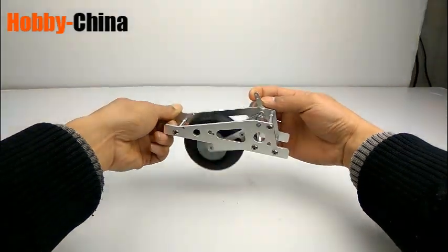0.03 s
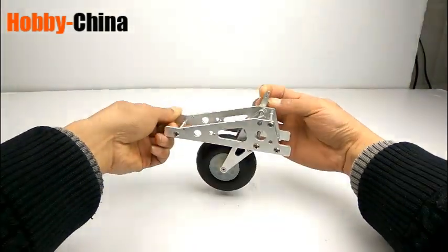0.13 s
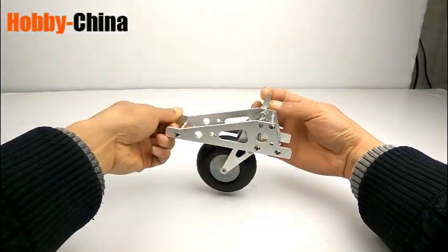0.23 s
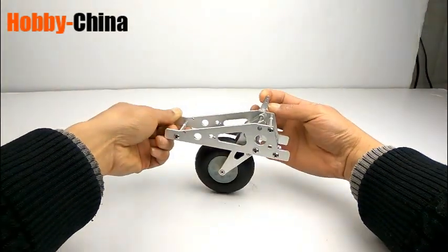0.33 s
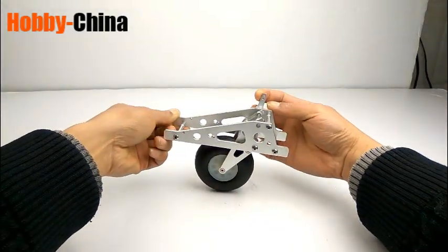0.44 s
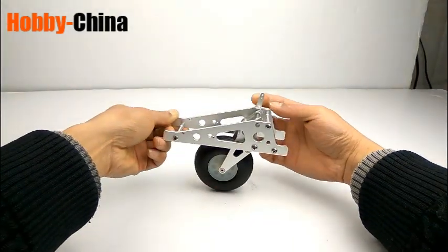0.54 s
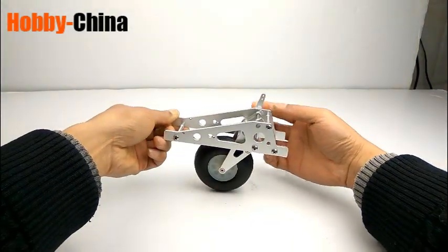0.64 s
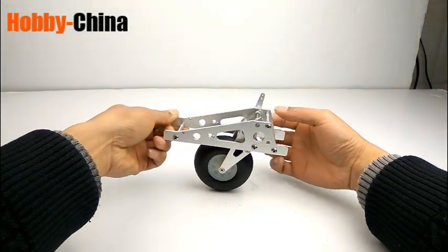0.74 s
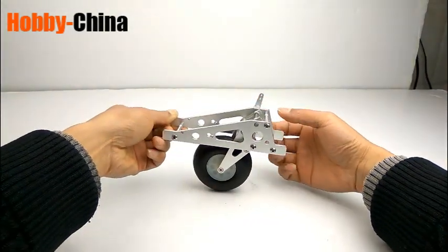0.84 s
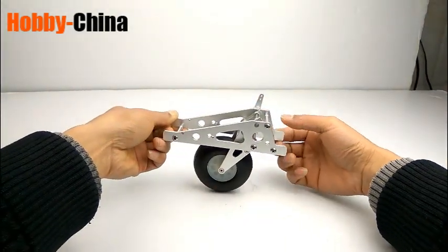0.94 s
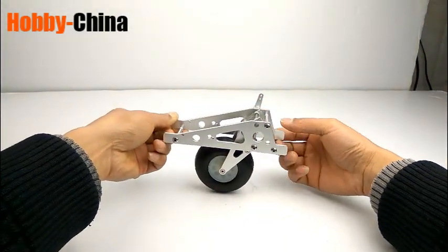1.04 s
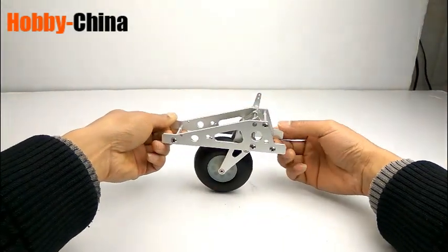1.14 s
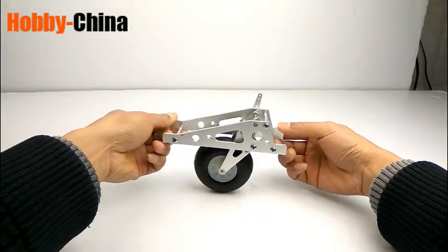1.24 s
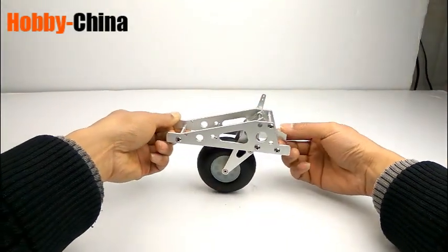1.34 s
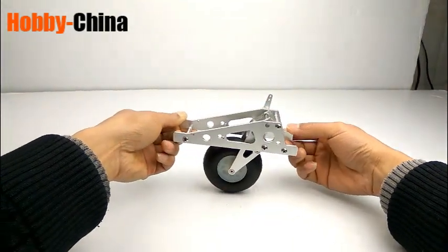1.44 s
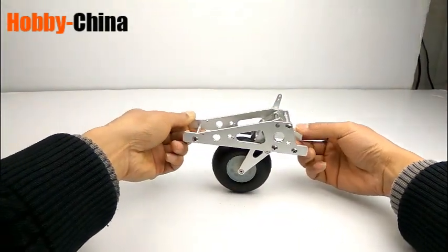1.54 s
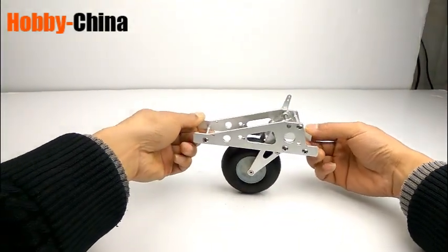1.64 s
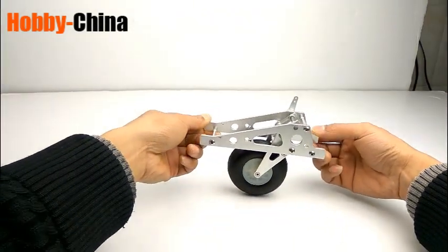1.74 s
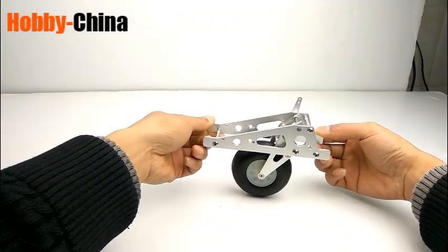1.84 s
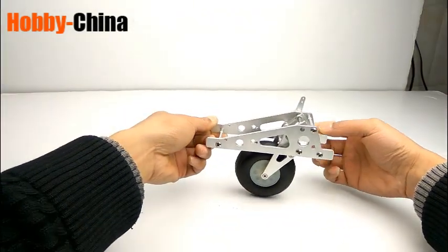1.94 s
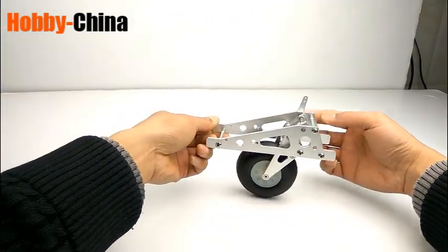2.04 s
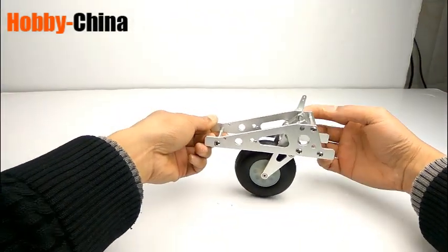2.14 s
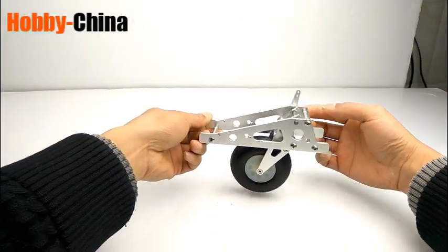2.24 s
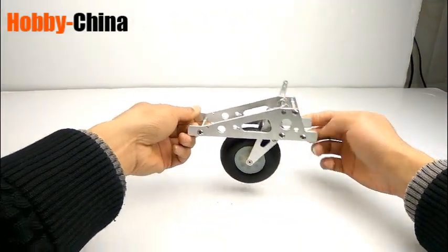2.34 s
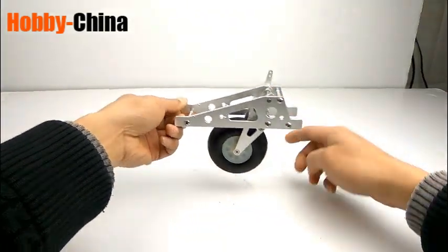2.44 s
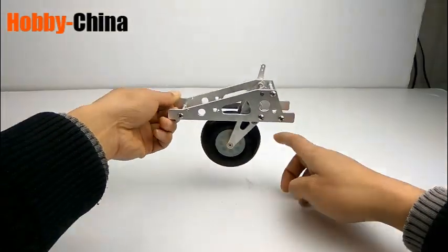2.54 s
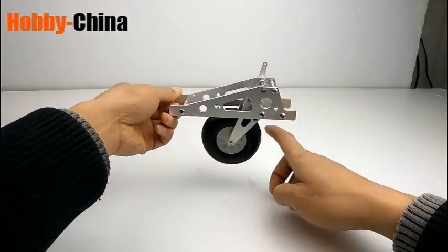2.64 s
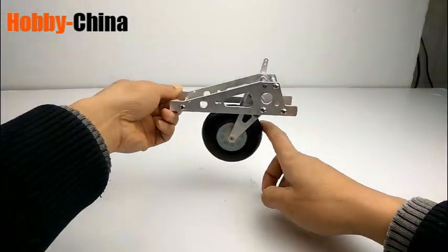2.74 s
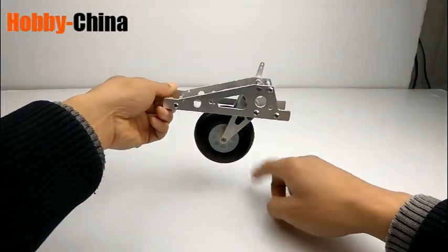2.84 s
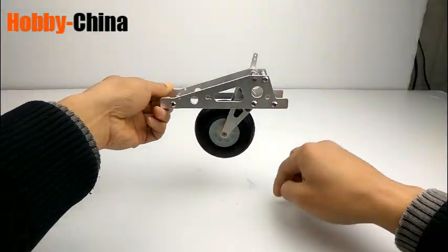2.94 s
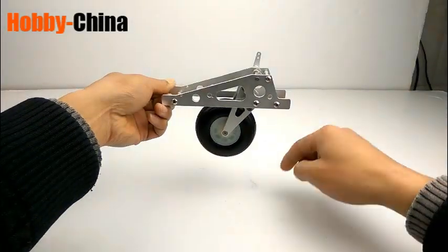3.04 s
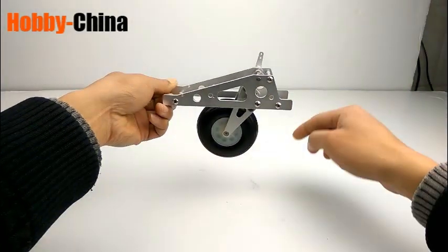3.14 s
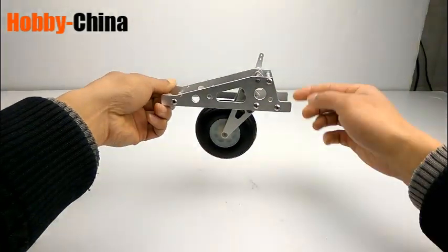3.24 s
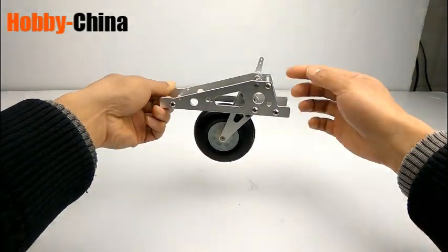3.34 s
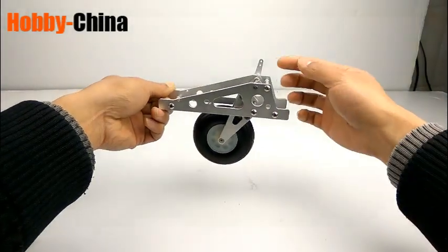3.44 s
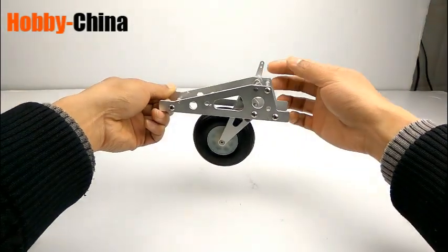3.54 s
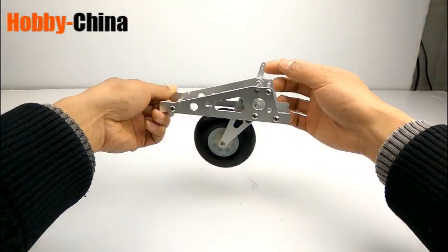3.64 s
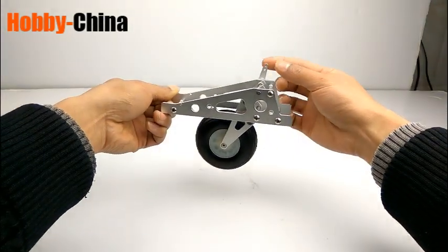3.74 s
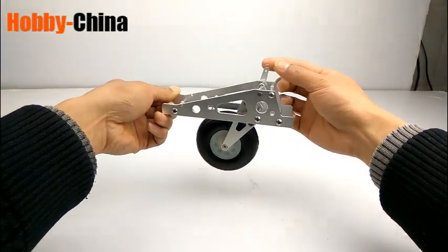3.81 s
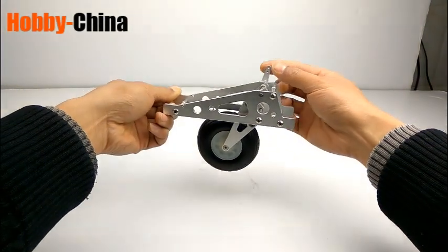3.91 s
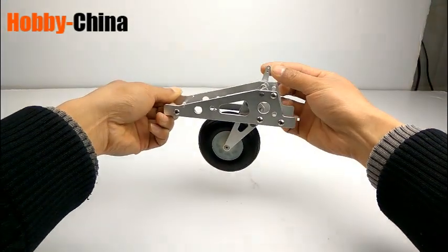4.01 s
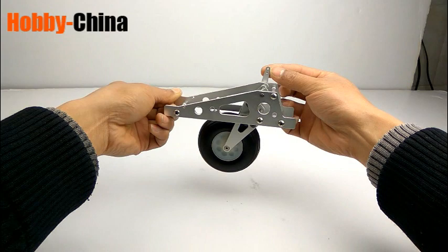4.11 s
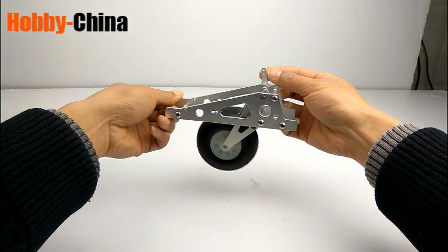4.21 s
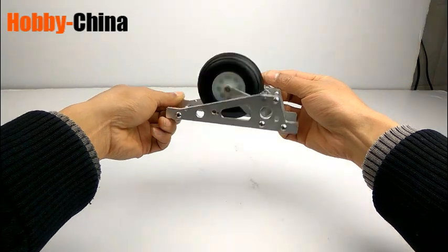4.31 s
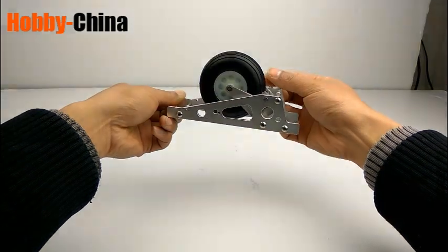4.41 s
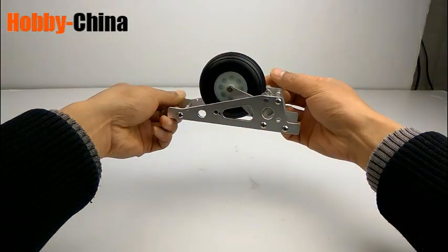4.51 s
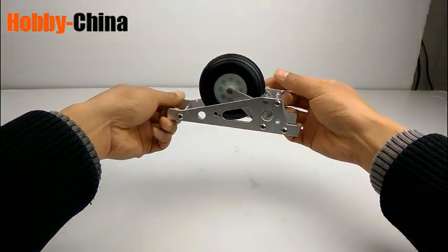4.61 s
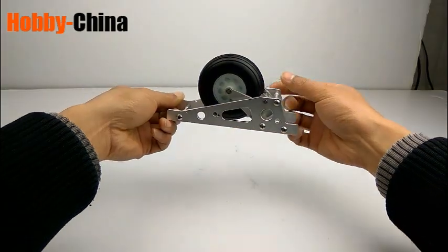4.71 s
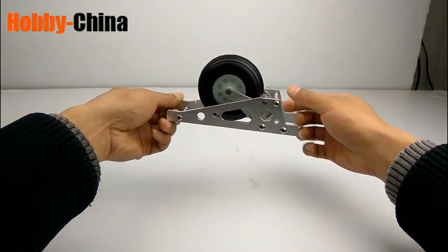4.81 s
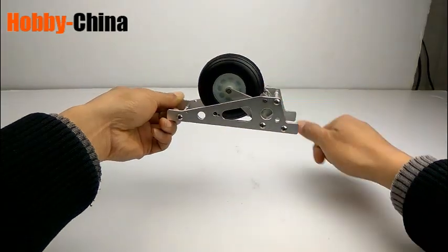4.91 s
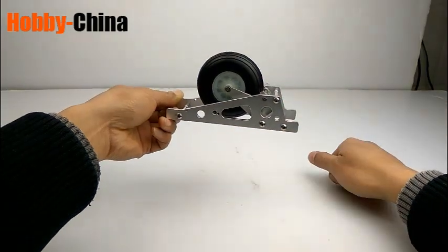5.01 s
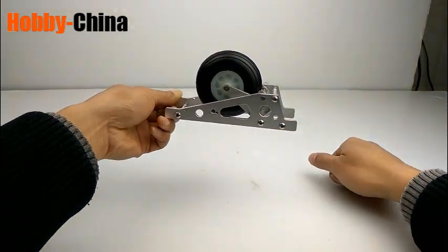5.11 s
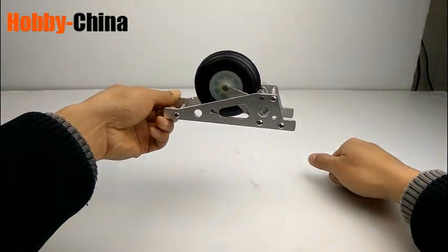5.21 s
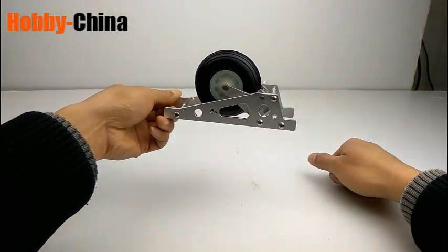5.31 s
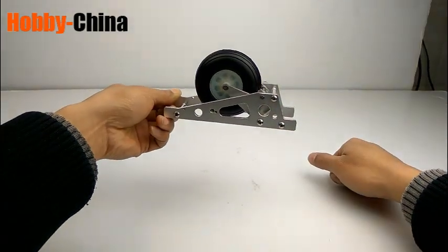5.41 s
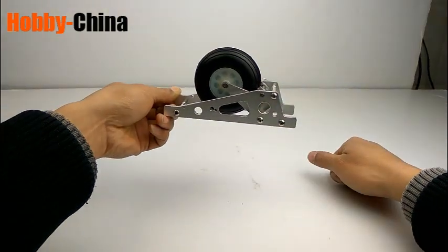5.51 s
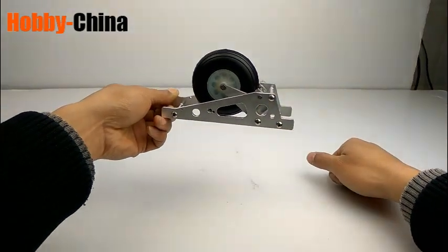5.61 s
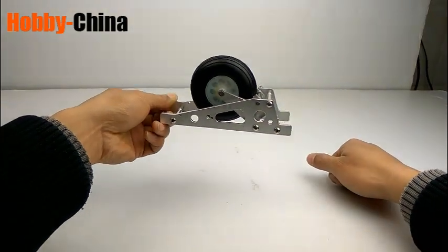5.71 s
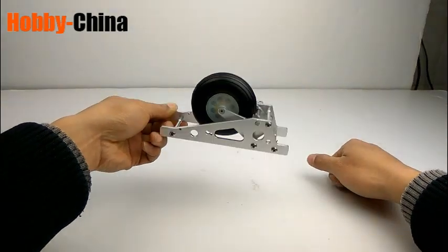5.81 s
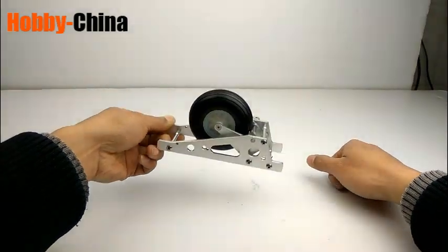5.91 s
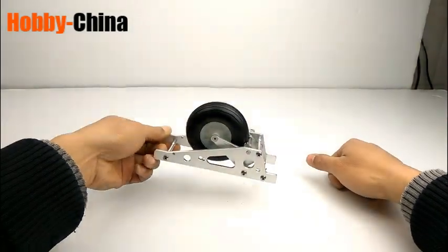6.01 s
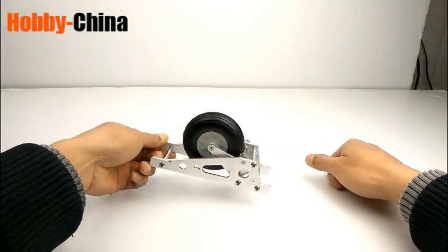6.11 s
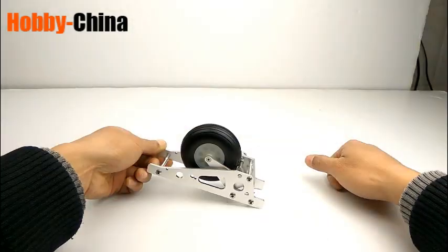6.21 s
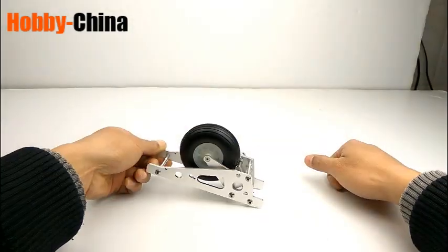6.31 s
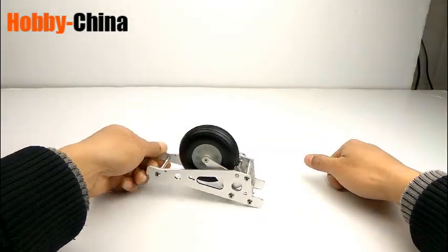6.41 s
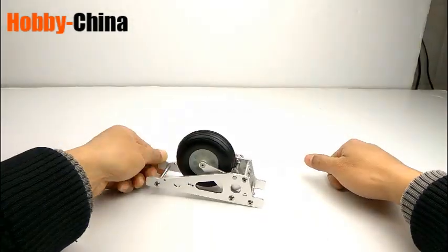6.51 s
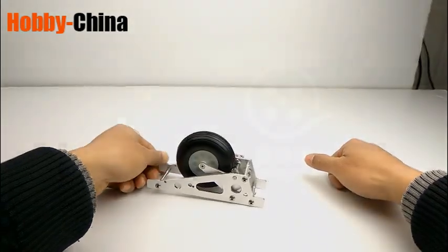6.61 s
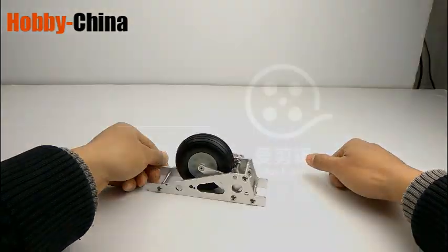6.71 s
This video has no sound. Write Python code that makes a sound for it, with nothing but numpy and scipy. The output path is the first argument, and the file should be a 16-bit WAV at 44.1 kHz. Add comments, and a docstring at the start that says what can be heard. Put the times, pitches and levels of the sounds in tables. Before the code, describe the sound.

Sharp ringing clacks from a hand-worked metal wheel leg alternate with dull table thumps and faint rustling of sleeves.

```python
"""Retractable wheel leg over a table

A small room, a stereo microphone at the table. A small aluminium wheel leg is worked by hand: its
linkage snaps down and later up into its lock with sharp clacks that ring the frame. A hand drops on
the table twice and the frame is set down, each thumping the board; sleeves slide softly over the top."""
import sys
import numpy as np
from scipy import signal
from scipy.fft import rfft, irfft
from scipy.io import wavfile

SR = 44100
rng = np.random.default_rng(int(sys.argv[2]) if len(sys.argv) > 2 else 0)


def log_audio(samples):
    """Write samples as a 16-bit WAV file to the path given in sys.argv[1]."""
    # one column per channel
    frames = np.atleast_2d(samples).T
    # limit to full scale, then quantise
    limited = np.clip(frames, -1, 1)
    pcm = np.round(limited * 32767).astype(np.int16)
    wavfile.write(sys.argv[1], SR, pcm)


N = 297675
TIME = np.arange(N) / SR
AGE = TIME[:SR]

# Spectra of the quiet room and of each kind of contact: frequency_hz, relative_db
ROOM_TONE_COLOUR = [(15, -45), (25, -13), (54, -1.5), (82, -15), (113, -2), (141, -7), (244, -4),
                    (269, -11), (390, -11), (420, -19), (475, -14), (742, -17.5), (1340, -27.5),
                    (2970, -32), (5000, -27), (9270, -45.5), (12100, -66), (20400, -120)]
SLEEVE_COLOUR = [(100, -9.5), (400, 1.5), (900, 1.5), (1400, -3), (2000, -5), (2800, -7.5), (4000, 0),
                 (5200, 1.5), (6200, -6), (7200, -13.5), (8500, -35), (12000, -56.5)]
FINGER_COLOUR = [(60, -19), (200, -1.5), (340, -5.5), (480, -8.5), (620, -6.5), (790, -8), (1200, -15),
                 (2500, -20), (6000, -30.5), (10000, -70.5)]
SCRAPE_COLOUR = [(200, 5), (900, -4.5), (1800, -7), (2300, -7), (3100, -6.5), (4200, -8.5), (5100, -5),
                 (6000, -15.5), (7200, -21), (9000, -53)]
THUD_COLOUR = [(30, -43.5), (60, -13.5), (100, -2), (220, -3), (400, -3.5), (900, -16), (2000, -17),
               (4000, -32), (9000, -59)]
CLACK_COLOUR = [(60, -14), (250, -12.5), (550, -6.5), (1000, -8), (1900, -2), (2700, -2), (3500, 1.5),
                (5000, 0.5), (6200, -2.5), (7300, -7), (8200, -18), (9200, -15.5), (10000, -38.5),
                (14000, -61.5)]
# Decay of the room: frequency_hz, t60_s
ROOM_DECAY = [(100, 0.74), (250, .5), (600, 0.22), (1500, 0.45), (3700, 0.32), (8000, 0.16)]
# Likeness of the diffuse sound at the left and right microphones: frequency_hz, correlation
STEREO_LIKENESS = [(100, 0.92), (300, 0.91), (600, 0.93), (1200, 0.0025), (2500, 0.019), (5000, 0.71)]
# Whine of the electronics: pitch_hz, rms_db
WHINE_TONES = [(9000, -103.5), (10500, -104), (12000, -91.5), (13500, -102)]

# Sleeves on the table, fingers on tyre and frame, the set-down frame sliding:
# start_s, length_s, level_db, resonance_hz
SLEEVE_STROKES = [(-0.1, 0.33, -69, 1750), (0.81, 0.23, -69, 1705), (1.41, 0.36, -67.5, 1410),
                  (2.02, .15, -80.5, 1980), (2.35, 0.5, -66, 2140), (3.12, 0.38, -69, 2180),
                  (4.52, 0.049, -66.5, 2180), (4.9, 0.32, -79.5, 4800), (6.05, 0.1, -71.5, 1994)]
FINGER_STROKES = [(0.07, 0.12, -76, 603), (0.88, 0.27, -77.5, 227), (1.55, 0.55, -78, 230),
                  (2.615, 0.06, -67.5, 310), (2.69, 0.05, -63.5, 760), (2.755, 0.05, -63, 350),
                  (2.87, 0.07, -66.5, 420), (3.69, 0.15, -80.5, 328), (4.06, 0.092, -77.5, 470),
                  (4.56, 0.057, -74, 490), (4.645, 0.075, -66, 387), (6.57, 0.13, -70.5, 300)]
SCRAPE_STROKES = [(6.39, 0.033, -68, 1900), (6.43, 0.17, -70, 5100)]

# Modes of the table board and of the aluminium frame: pitch_hz, relative_db, t60_s
BOARD_MODES = [(80.7, -2, 0.64), (121, 2, 0.42), (165.1, -0.5, 0.77), (205.5, -3, .45), (267.5, -7, .33),
               (298.7, -6, 0.6), (412.4, -12.5, 0.26), (511, -10.5, 0.39), (582, -9, .26), (647.3, -4, .22),
               (760, -3.5, .2), (921, -0.5, 0.13), (1050, -8.5, .13), (1253, -15.5, .22)]
FRAME_MODES = [(580, -2, 0.11), (1399, -9, 0.086), (2100, -4, 0.091), (2328, -4, .06), (3000, -6.5, 0.028),
               (3750, -1, 0.041), (3754, 0, 0.07), (3920, -5.5, 0.062), (4480, -4, 0.042), (4800, 1, .05),
               (4830, -2, .05), (5700, -3, .04), (8580, -1.5, 0.031)]
# From here on, levels are relative; a place runs from 0 to 1 along the board.
# An arm nudging the table: start_s, level_db, push_hz, place
ARM_NUDGES = [(0.418, -18, 131, .32), (0.449, -31.5, 396, 0), (1.924, -36.5, 194, 0.3),
              (2.622, -31, 350, 0.07)]
# Blows on the table: a tap jangles loose parts; a knock and the deeper thud of the weight land
# together or milliseconds apart: start_s, tap_db, tap_hz, jangle_db, jangle_ms, knock_db, knock_hz,
# weight_lag_s, weight_db, weight_hz, weight_thud_db, place
TABLE_BLOWS = [(2.9527, -10.5, 1120, -17.5, 6.7, -1, 432, 0.0097, -2, 214, 2.5, .23),
               (5.0530, -39.5, 5270, -33.5, 34, -10.5, 276, .0120, -6.5, 168.6, -5, 0.46),
               (6.3136, -24.5, 4670, -27, 7, -18, 373, 0.00076, -3, 146, 0.5, 0.27)]
# Single ticks of the loose joints: start_s, level_db, ring_hz
JOINT_TICKS = [(2.066, -49.5, 1720), (2.925, -38, 800), (3.002, -32, 2100), (3.356, -45.5, 1900),
               (4.027, -42, 1470), (4.078, -46.5, 996), (4.3271, -30.5, 7900), (4.431, -32.5, 3700),
               (6.638, -47, 2620)]
# The leg snapping into its lock: catch_s, catch_db, travel_to_stop_s, stop_db, stop_chatter_ms
LOCK_SNAPS = [(0.2313, -16.5, .0086, -7.5, 1.3), (4.3941, -15.5, .0048, -14, 5.5)]


def from_db(db):
    """Decibels to gain."""
    return 10 ** (np.asarray(db) / 20)


def unit(x):
    """Scale to an energy of one per channel."""
    return x / np.sqrt(np.sum(x ** 2, axis=-1, keepdims=True) + 1e-20)


def at_hz(points, hz):
    """Read a table on a log-frequency axis."""
    frequencies, values = np.transpose(points)
    return np.interp(np.log(hz + 1), np.log(frequencies), values)


def add(track, start_s, sound):
    """Mix a sound in at a time."""
    start = round(start_s * SR)
    track[:, start:start + sound.shape[-1]] += sound[..., :N - start]


def dying(t60, age):
    """Envelope that falls 60 dB in t60 seconds."""
    return np.exp(-np.log(1000) * age / t60)


def ring(hz, t60, age):
    """One struck mode."""
    return np.sin(2 * np.pi * hz * age) * dying(t60, age)


def soften(x, hz):
    """A longer contact takes the highs away."""
    return signal.sosfilt(signal.butter(2, min(hz, SR / 2 - 1), fs=SR, output="sos"), x)


def colour(x, spectrum):
    """Causal (minimum-phase) filter with the given spectrum."""
    size = 4096
    gains = from_db(at_hz(spectrum, np.fft.rfftfreq(size, 1 / SR)))
    cepstrum = irfft(np.log(gains))
    cepstrum[1:size // 2] *= 2
    cepstrum[size // 2 + 1:] = 0
    response = irfft(np.exp(rfft(cepstrum)))
    return signal.oaconvolve(x, response[None], axes=-1)[:, :x.shape[-1]]


def diffuse(size):
    """White noise at both microphones: alike in the bass, unrelated at 1-2.5 kHz, partly alike above."""
    mid, side = rfft(rng.standard_normal((2, size)))
    alike = np.clip(at_hz(STEREO_LIKENESS, np.fft.rfftfreq(size, 1 / SR)), -1, 1)
    return irfft(np.sqrt((1 + alike) / 2) * mid + np.sqrt((1 - alike) / 2) * side * [[1], [-1]], size)


def noise(spectrum):
    """Steady coloured stereo noise, rms 1."""
    return unit(colour(diffuse(N), spectrum)) * np.sqrt(N)


def off_axis(x, lag_s):
    """Sound from the left reaches the right microphone a little later."""
    return np.array([np.interp(TIME + side * lag_s / 2, TIME, channel, left=0)
                     for side, channel in zip((1, -1), x)])


def room_tone():
    """The low, steady background of the room."""
    return off_axis(from_db(-67) * noise(ROOM_TONE_COLOUR), lag_s=0.0001)


def room(x, wet_db, build_s):
    """The small room adds a diffuse tail that builds quickly and dies octave by octave."""
    hz, white = np.fft.rfftfreq(SR, 1 / SR), rfft(diffuse(SR))
    centres = np.geomspace(62.5, 16000, 9)
    tail = np.zeros((2, SR))
    for centre, share in zip(centres, np.eye(len(centres))):
        octave = irfft(white * at_hz(np.c_[centres, share], hz), SR)
        tail += octave * dying(at_hz(ROOM_DECAY, centre), AGE)
    tail = unit(tail * (1 - np.exp(-AGE / build_s)) ** 2)
    return x + from_db(wet_db) * signal.fftconvolve(x, tail, axes=-1)[:, :N]


def wall_echo(x, delay_s, echo_db, lag_s):
    """The wall behind the table throws back one early echo, from another direction."""
    echo = [np.interp(TIME - delay_s, TIME, channel, left=0) for channel in x]
    return x + from_db(echo_db) * off_axis(echo, lag_s)


def rubbing(strokes, spectrum, attack_s, release_t60, resonance_db, q, grain_db, grains_per_s):
    """Friction swells, holds and fades, catching and slipping; each stroke excites a broad resonance."""
    knots = np.cumsum(rng.exponential(1, N // 20)) / grains_per_s
    grain = from_db(grain_db * np.interp(TIME, knots, rng.standard_normal(len(knots))))
    friction, out = noise(spectrum), np.zeros((2, N))
    for start_s, length_s, db, hz in strokes:
        during = (TIME > start_s) & (TIME < start_s + length_s + release_t60)
        age, rub = TIME[during] - start_s, friction[:, during]
        swell = np.minimum(age / attack_s, 1) * dying(release_t60, np.maximum(age - length_s, 0))
        resonance = unit(signal.lfilter(*signal.iirpeak(hz, q, fs=SR), rub)) * np.sqrt(len(age))
        out[:, during] += from_db(db) * swell * (rub + from_db(resonance_db) * resonance)
    return out * grain


def board_push(modes, push_hz, place, thud_db, bass_db=1.5):
    """A push rings the board; the three lowest modes answer by their sine shapes at the place struck."""
    shapes = np.ones(len(modes))
    shapes[:3] = from_db(bass_db) * np.abs(np.sin(np.pi * place * np.arange(1, 4)))
    board = from_db(-31.5) * shapes @ modes
    push = from_db(-19.5) * ring(push_hz, t60=8.8 / push_hz, age=AGE)
    damped_modes = colour(diffuse(SR) * dying(t60=.3, age=AGE), THUD_COLOUR)
    thud = from_db(thud_db) * unit(damped_modes)
    cutoff_hz = 440 * (push_hz / 200) ** 2.03   # the slower the push, the duller the contact
    return soften(board + push + thud, cutoff_hz)


def table_thumps():
    """Each blow thumps the board with a knock and a deeper thud; an arm nudges it softly."""
    out = np.zeros((2, N))
    modes = np.array([from_db(db) * ring(hz, t60, AGE) * (-1) ** k
                      for k, (hz, db, t60) in enumerate(BOARD_MODES)])
    for start_s, *_, knock_db, knock_hz, lag_s, weight_db, weight_hz, thud_db, place in TABLE_BLOWS:
        knock = board_push(modes, knock_hz, place, thud_db=2.5, bass_db=-27.5)
        weight = board_push(modes, weight_hz, place, thud_db)
        add(out, start_s + .0015, from_db(knock_db) * knock)
        add(out, start_s + lag_s, from_db(weight_db) * weight)
    for start_s, db, push_hz, place in ARM_NUDGES:
        add(out, start_s, from_db(db) * board_push(modes, push_hz, place, thud_db=0))
    return out


def strike(track, start_s, db, ring_hz, ring_db, chatter_ms, cutoff_hz=13500, pan_db=0):
    """Add a metal contact: a crack, the struck part's short ring, micro-bounces and the frame's ring."""
    age = AGE[:SR // 5]
    crack = from_db(-9.5) * (age == 0)
    part = from_db(ring_db) * unit(ring(ring_hz, t60=.0052, age=age))
    bounces = from_db(7.5) * unit(diffuse(len(age)) * np.exp(-age * 1000 / chatter_ms))
    modes = np.array([from_db(mode_db) * ring(hz, t60, age) for hz, mode_db, t60 in FRAME_MODES])
    strengths = from_db(rng.normal(0, 1.8, (2, len(modes)))) * rng.choice([-1, 1], (2, len(modes)))
    frame = from_db(-10.5) * unit(strengths @ modes)
    gains = from_db(db + np.array([[pan_db], [-pan_db]]) / 2)
    add(track, start_s, gains * soften(crack + part + bounces + frame, cutoff_hz))


def taps_and_jangles(cutoff_hz=6700):
    """Each blow on the table opens with a tap that sets loose parts jangling."""
    out = np.zeros((2, N))
    for start_s, tap_db, tap_hz, jangle_db, jangle_ms, *_ in TABLE_BLOWS:
        tap = dict(ring_hz=tap_hz, chatter_ms=1.6, cutoff_hz=cutoff_hz)
        if tap_db > -14:   # a light brush comes just before a hard tap
            strike(out, start_s - .005, tap_db - 18.5, ring_db=-5, **tap)
        strike(out, start_s, tap_db, ring_db=3.5, **tap)
        ring_db = 10 + .6 * (jangle_db + 16.5)   # a weaker jangle rings less
        strike(out, start_s + .0045, jangle_db, ring_hz=1900, ring_db=ring_db,
               chatter_ms=jangle_ms, cutoff_hz=cutoff_hz)
    return out


def loose_joints(shudder_peak_s=4.28, gap_s=.0083, rise_db=7.5, fall_db=4):
    """The rising leg shudders in its pivot, in even touches that grow and die away; the joints tick."""
    out = np.zeros((2, N))
    for touch in range(-2, 4):
        db = -22 + min(touch * rise_db, -touch * fall_db)
        strike(out, shudder_peak_s + touch * gap_s, db, ring_hz=4750, ring_db=-3.5,
               chatter_ms=6.6, cutoff_hz=7400)
    for start_s, db, hz in JOINT_TICKS:
        strike(out, start_s, db, hz, ring_db=1.5, chatter_ms=2.8, cutoff_hz=1.6 * hz)
    return out


def lock_clacks():
    """Steel on steel: the lever grazes the catch, drops in, meets the end stop and rebounds once."""
    out = np.zeros((2, N))
    for catch_s, catch_db, travel_s, stop_db, stop_ms in LOCK_SNAPS:
        graze_s, stop_s = catch_s - .0133, catch_s + travel_s
        rebound_s = stop_s + .0037
        strike(out, graze_s, catch_db - 19.5, ring_hz=6300, ring_db=-5, chatter_ms=8, pan_db=1)
        strike(out, catch_s, catch_db, ring_hz=6300, ring_db=2, chatter_ms=6, pan_db=-1)
        strike(out, stop_s, stop_db, ring_hz=4700, ring_db=-2, chatter_ms=stop_ms, pan_db=1)
        strike(out, rebound_s, catch_db - 2, ring_hz=3350, ring_db=0, chatter_ms=7.5, pan_db=-1)
    return out


def scene():
    """At the microphone: linkage and table just left of centre, over rubbing, room tone and hiss."""
    metal = from_db(7) * colour(lock_clacks() + loose_joints() + taps_and_jangles(), CLACK_COLOUR)
    metal = off_axis(metal, lag_s=.00005)
    metal = wall_echo(metal, delay_s=.0063, echo_db=-12.5, lag_s=.0003)   # a path about 2 m longer
    metal = room(metal, wet_db=-11, build_s=.0037)
    wood = room(off_axis(table_thumps(), lag_s=.00014), wet_db=-14, build_s=.011)
    sleeves = rubbing(SLEEVE_STROKES, SLEEVE_COLOUR, attack_s=.099, release_t60=.85,
                      resonance_db=-10, q=4.5, grain_db=2.17, grains_per_s=170)
    scrape = rubbing(SCRAPE_STROKES, SCRAPE_COLOUR, attack_s=.032, release_t60=.98,
                     resonance_db=-1.5, q=3, grain_db=3, grains_per_s=77)
    fingers = rubbing(FINGER_STROKES, FINGER_COLOUR, attack_s=.028, release_t60=.23,
                      resonance_db=7, q=3, grain_db=1.5, grains_per_s=74)
    handling = scrape + off_axis(sleeves + fingers, lag_s=.00034)
    air = room_tone()
    preamp_hiss = from_db(-92) * rng.standard_normal((2, N))
    return preamp_hiss + air + handling + wood + metal


def microphone_ports(x, hz, width_hz, count):
    """The microphone ports hold the band around their resonance back by about a millisecond."""
    radius = np.exp(-np.pi * width_hz / SR)
    poles = [1, -2 * radius * np.cos(2 * np.pi * hz / SR), radius ** 2]
    all_pass = poles[::-1] + poles
    return signal.sosfilt([all_pass] * count, x)


def record(dry):
    """The microphone: its ports smear the clicks, the electronics whine, deep bass and top are cut."""
    low_cut = signal.butter(8, 48, "high", fs=SR, output="sos")
    high_cut = signal.ellip(10, .1, 80, 14000, fs=SR, output="sos")
    smeared = microphone_ports(dry, hz=4170, width_hz=1400, count=3)
    whine = sum(from_db(db) * np.sqrt(2) * np.sin(2 * np.pi * hz * TIME) for hz, db in WHINE_TONES)
    return signal.sosfilt(high_cut, signal.sosfilt(low_cut, smeared) + whine)


dry = scene()
out = record(dry)
log_audio(out)
```